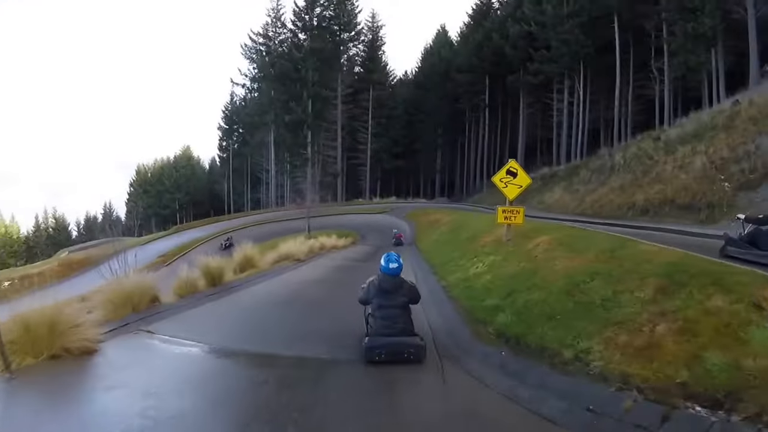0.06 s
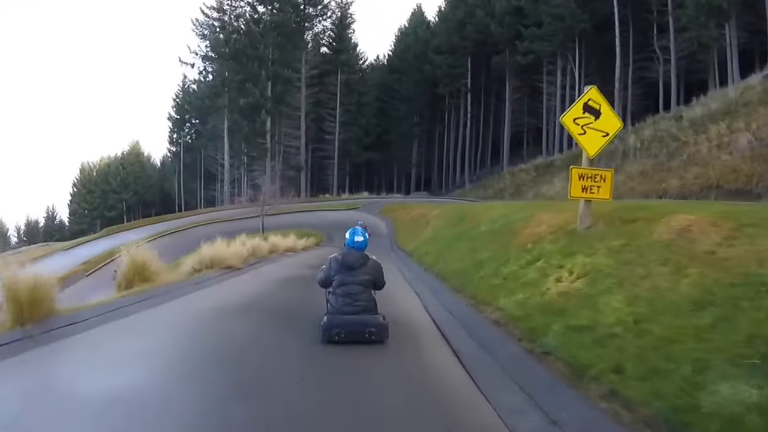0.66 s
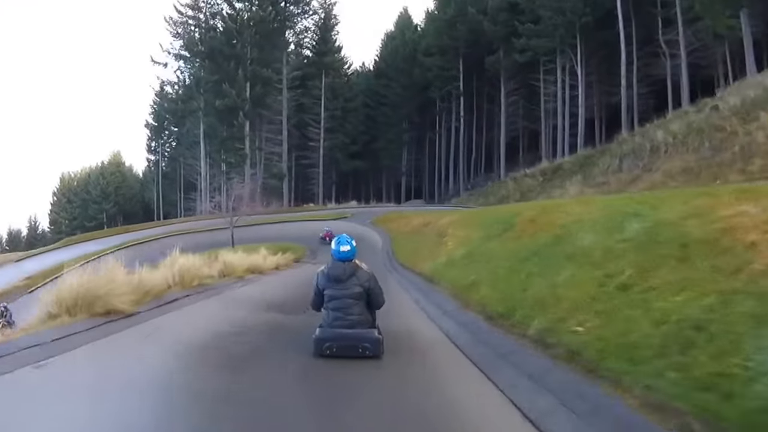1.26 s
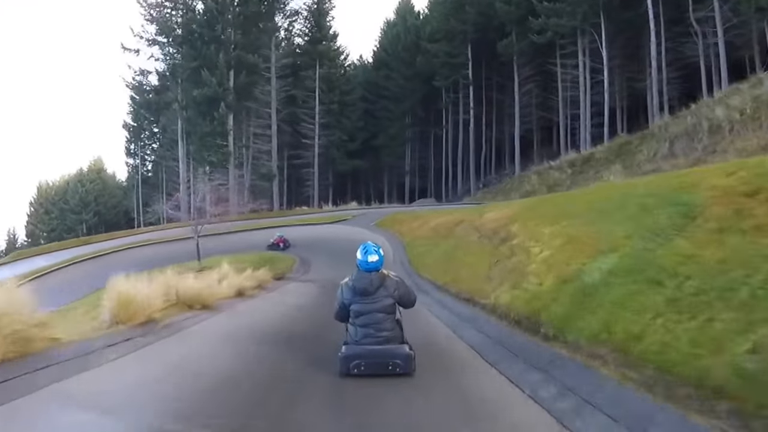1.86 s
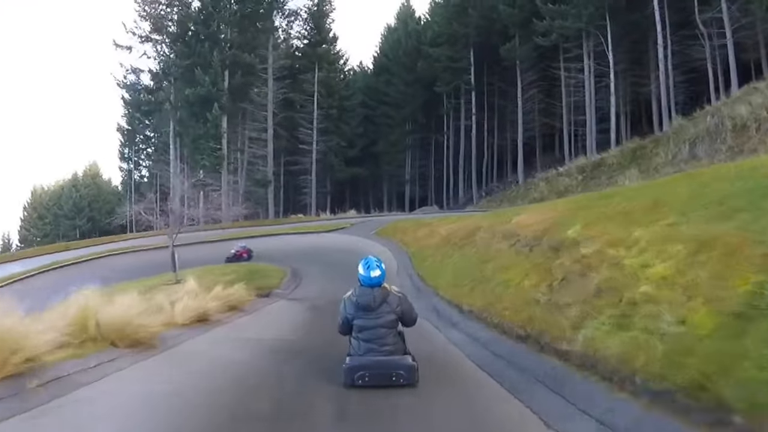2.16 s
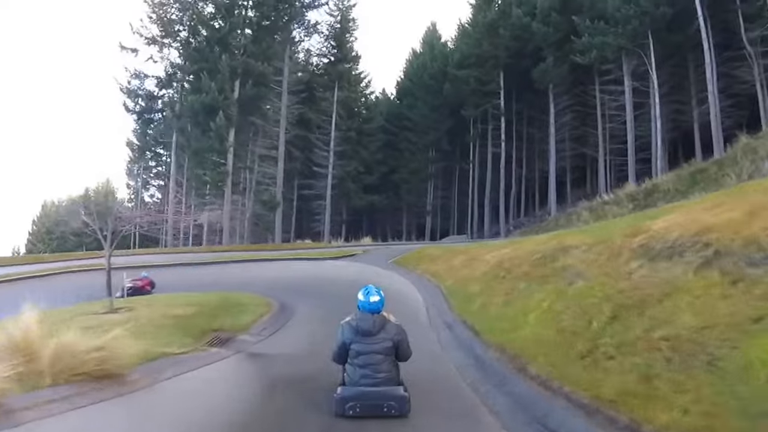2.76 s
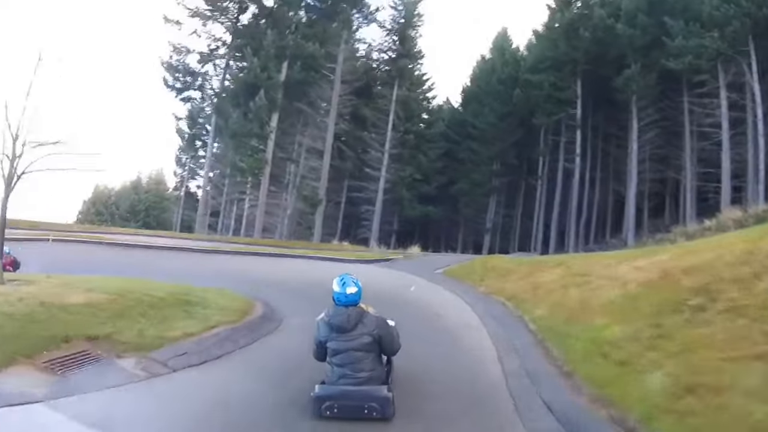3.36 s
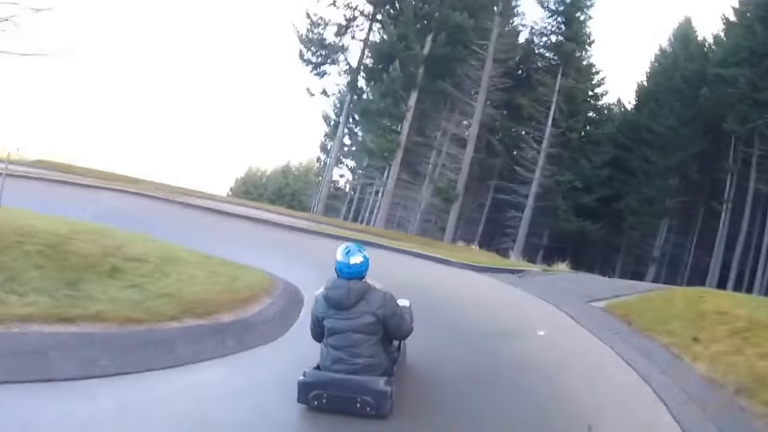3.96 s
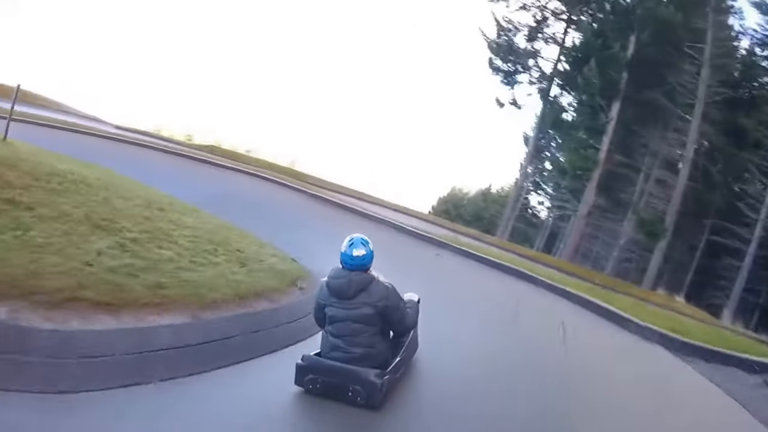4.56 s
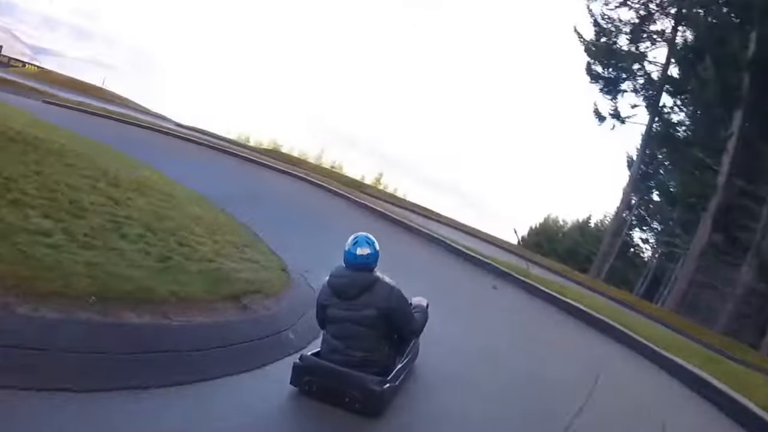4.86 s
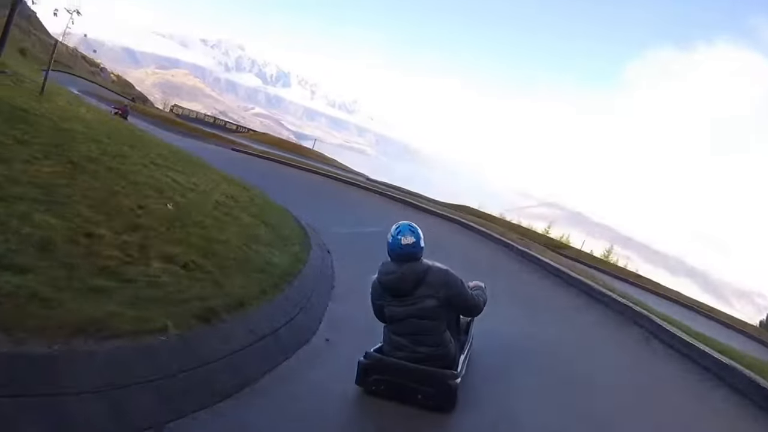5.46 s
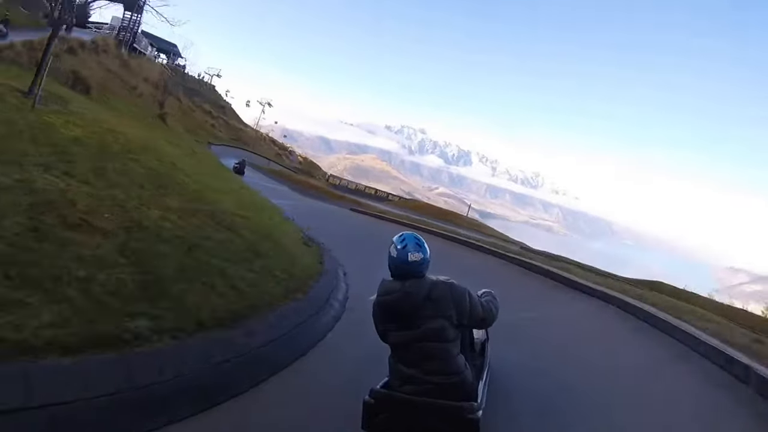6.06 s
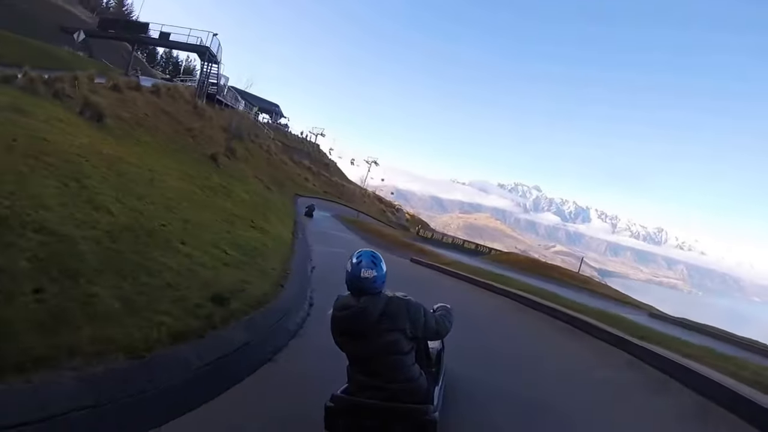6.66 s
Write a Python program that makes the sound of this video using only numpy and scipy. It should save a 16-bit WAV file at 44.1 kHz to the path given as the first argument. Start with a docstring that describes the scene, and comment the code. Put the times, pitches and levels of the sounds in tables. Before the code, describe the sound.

Small hard cart wheels rumble and hiss along damp concrete, with knocks from the track and wind buffeting the microphone.

```python
"""Luge cart on damp concrete, from the seat.

The microphone rides close above small hard wheels that drum the plastic shell, chatter once or twice
a turn and hiss on the wet track. Joints knock the chassis and its hollow tub, and grit ticks against it.
Gusts buffet the microphone, mostly on the straight; in a long bend the treads scrub and skip."""
import sys
import numpy as np
from scipy import signal
from scipy.fft import rfft, irfft, next_fast_len
from scipy.io import wavfile

SR = 44100
rng = np.random.default_rng(int(sys.argv[2]) if len(sys.argv) > 2 else 0)


def waveform_to_disk(signal):
    """Save audio, clipped to [-1, 1], as 16-bit WAV at the path in sys.argv[1]."""
    frames = np.transpose(np.atleast_2d(signal))
    scaled = np.clip(frames, -1, 1) * 32767
    samples = np.round(scaled).astype(np.int16)
    wavfile.write(sys.argv[1], SR, samples)


N = 295470
T = np.arange(N) / SR
BINS = np.fft.rfftfreq(8192, 1 / SR)

# Resonances of the cart around the microphone. Each row: frequency in Hz, width in Hz, relative dB.
SHELL_MODES = [(168.3, 30, 3.5), (230.3, 32, 4), (309.2, 64, -3.5), (385, 170, -12.5)]  # plastic shell with its rider
PAN_MODES = [(461, 38, -0.5), (527, 28, -4), (579, 28, -9), (665, 18, -14), (683, 50, -10), (765, 46, -14)]  # floor pan
CHASSIS_MODES = [(859, 106, 6.5), (995, 70, -7.5), (1082, 210, -0.5), (1244, 120, -2), (1485, 110, -7),
                 (1763, 220, -6.5)]  # axles and steering
TREAD_MODES = [(2190, 320, -7), (2610, 820, -14.5), (3200, 720, -14)]
CONTACT_MODES = [(5080, 330, -0.5), (5496, 350, 3)]  # bright rings where wheel meets track
RIM_MODES = [(6450, 210, 0), (6600, 280, -5)]
TUB_MODES = [(306, 21, 7), (403, 42, 1.5), (516, 57, -21), (610, 60, -2.5), (1200, 50, -27),
             (1290, 50, -19), (1430, 38, -27)]
SCRUB_MODES = [(974, 110, 7.5), (1040, 100, -1), (1300, 95, 9), (1470, 93, 0.5), (1770, 300, -5.5),
               (3270, 530, -23)]  # woken by wheels sliding sideways
# Spectra of spray on the cart and air on the microphone. Each row: frequency in Hz, relative dB.
SPRAY_SPECTRUM = [(2500, -12), (4200, -5.5), (6000, 1), (7500, -2), (8800, -3.5), (9900, -4),
                  (10450, -16.5), (11100, -20.5), (11600, -27.5), (13000, -27)]
AIR_SPECTRUM = [(5, -28.5), (18, -16), (32, 2.5), (50, 0), (80, -1), (125, -7.5), (200, -9), (400, -28),
                (900, -45.5), (3000, -77.5)]

# The cart's pace. Each row: time in seconds, wheel turns per second.
WHEEL_SPEED = [(0.0, 18.68), (0.42, 18.8), (0.84, 20.24), (1.26, 19.94), (1.68, 19.46), (2.09, 20.24),
               (2.51, 20.0), (2.93, 20.96), (3.35, 22.34), (3.77, 22.22), (4.19, 21.38), (4.61, 20.78),
               (5.03, 20.6), (5.44, 21.26), (5.86, 20.78), (6.28, 20.9), (6.7, 20.72)]
# Wheel chatter, deeper in the bend. Each row: time in seconds, depth from 0 to 1.
CHATTER_DEPTH = [(0, 0.1), (1.8, 0.29), (3.1, 0.18), (4.1, 0.4), (5.0, 0.35), (5.6, 0.41), (6.3, 0.25),
                 (6.7, 0.44)]
# The concrete below. Each row: time in seconds, then roughness, pan growl and chassis chatter in dB.
SURFACE = [(0, -2, -27.5, -37), (.3, -1, -26.5, -38.5), (.9, 0.5, -28, -39), (1.15, 1.5, -28, -39),
           (1.5, -2.5, -28.5, -40), (1.75, 3, -25.5, -39.5), (2.15, 1, -30.5, -41.5),
           (2.4, -0.5, -26.5, -40), (2.7, -1.5, -31, -41.5), (3.1, -0.5, -27, -37), (3.6, -1, -26.5, -38.5),
           (4.3, -0.5, -30, -42.5), (4.8, 0, -29.5, -39), (5.45, 1, -26.5, -36), (5.95, 0.5, -27.5, -40),
           (6.2, -0.5, -28, -38), (6.7, 2, -27, -37.5)]
# Smoother or drier patches. Each row: centre and length in seconds, drops of rolling and hiss in dB.
LULLS = [(0.075, 0.044, 4.5, 5.5), (0.702, 0.11, 3.5, 3), (0.845, 0.036, 4.5, -1), (1.135, 0.075, 5, -1),
         (1.767, 0.11, -1, 4.5), (2.093, 0.075, 3, 4), (2.91, 0.048, 3.5, -1.5), (3.68, 0.075, 6, 3),
         (4.287, 0.098, 2.5, 1.5)]
# Water on the track. Each row: time in seconds, wetness in dB.
WETNESS = [(0, 8), (.2, -2), (.42, -4.5), (.8, 3), (1.1, 0), (1.6, 3), (2.1, 1.5), (2.6, 2), (3.5, 3.5),
           (3.65, 0), (4.1, 0.5), (4.75, -4), (5.1, 3), (5.6, 2.5), (6.3, 0), (6.7, 3.5)]
# Steady airflow on the microphone. Each row: time in seconds, level in dB.
AIRFLOW = [(0, -18), (.45, -22), (1.1, -22), (1.5, -22.5), (1.85, -22), (2.5, -25.5), (3.1, -18.5),
           (3.5, -24.5), (4.0, -25), (4.85, -29), (5.25, -22.5), (6.1, -25.5), (6.7, -26)]
# Gusts on top of it. Each row: peak time in seconds, length in seconds, rise in dB.
GUSTS = [(.325, 0.12, 6), (.6, 0.06, 8), (.93, 0.046, 8), (1.01, 0.079, 8), (1.21, 0.042, 6.5),
         (1.33, .06, 9), (1.91, 0.056, 3), (2.06, 0.043, 4), (2.38, 0.18, 7), (2.66, 0.18, 2.5),
         (3.02, 0.1, 4), (3.16, 0.093, 3), (3.28, 0.046, 9), (3.61, 0.08, 8)]
# Single eddies of air. Each row: time in seconds, relative level in dB, pitch in Hz.
EDDIES = [(0.168, 3, 69.5), (0.306, -2, 95), (.328, 4.5, 115), (.518, -1, 55), (0.588, -1.5, 125),
          (0.924, 0, 92.5), (0.999, 5.5, 173), (1.062, -4, 120), (1.194, -5, 85), (1.321, -8, 55),
          (2.107, 5.5, 165), (2.315, 1, 45), (2.377, -5, 55), (2.437, -3, 50), (2.584, -1.5, 55),
          (2.648, -1.5, 50), (2.709, 4.5, 105), (2.836, 0, 48), (2.995, 6, 123), (3.036, 3, 62),
          (3.623, 1, 55)]
# Track joints. Each row: start in seconds, clack, thud and splash in relative dB, rattle decay in seconds.
JOINTS = [(.005, -21, -32, -38, 0.026), (0.031, -16, -19, -39, .008), (.098, -23.5, -4, -43, 0.013),
          (.138, -19.5, -6, -43, 0.0084), (0.262, -25.5, 2, -40, 0.02), (0.413, -26, 0.5, -45, 0.013),
          (0.614, -17, 6, -43, 0.0049), (0.634, -20.5, -3.5, -39.5, 0.012), (.742, -16.5, -1, -38, 0.0057),
          (0.758, -17.5, -12, -37, 0.0095), (.881, -25.5, -28, -42, 0.017), (0.914, -31, -3, -52, 0.014),
          (.982, -22, -12, -42, 0.012), (1.179, -29, 1.5, -46, 0.0098), (1.252, -27, -15, -54, .008),
          (1.387, -26, 3.5, -48, 0.0055), (1.643, -24, -11, -51, 0.016), (1.692, -20, -3, -39, 0.027),
          (1.745, -18.5, 3.5, -40, 0.0066), (1.892, -29, 4, -50, 0.005), (1.936, -24, -6, -44, 0.03),
          (1.987, -24, 0.5, -41, 0.011), (2.004, -23, -5, -45, 0.0091), (2.106, -42, 3.5, -50, 0.0074),
          (2.186, -27, 1, -42, .008), (2.379, -22, -2, -47, 0.0075), (2.426, -22, -6, -55, 0.012),
          (2.476, -27, -1, -52, 0.006), (2.714, -20, -6, -50, 0.0055), (2.829, -21, -14, -39, 0.0086),
          (2.846, -34, 0.5, -48, 0.0058), (2.967, -22.5, -15, -43, 0.013), (3.039, -26, -12, -42, 0.016),
          (3.144, -38, -4, -53, 0.012), (3.207, -30, -16, -54, 0.0082), (3.294, -28, 2, -40, 0.016),
          (3.367, -25, -12, -41, 0.022), (3.42, -36, -4.5, -50, 0.008), (3.545, -23.5, -9, -38.5, 0.023),
          (3.567, -24, -4.5, -41, 0.015), (3.699, -21, -1.5, -38, 0.022), (4.063, -24, -7.5, -41, 0.052),
          (4.487, -23, 0.5, -46, 0.0079), (5.022, -29, -8, -46, 0.0068), (5.373, -34, 0, -54, 0.0095),
          (5.975, -28, 2, -44, 0.01), (6.025, -40, 2.5, -58, 0.0074), (6.304, -34, -0.5, -50, 0.0058)]
# Loose steering parts clinking. Each row: start in seconds, pitch in Hz, level in dB.
CLINKS = [(.006, 2130, -29.5), (0.033, 1250, -34), (0.15, 1250, -35), (.613, 2220, -40), (0.745, 1270, -29),
          (2.987, 1050, -35), (3.049, 1000, -31), (3.147, 1050, -39)]
# Stones flung against the cart. Each row: start in seconds, relative level in dB.
STONES = [(.19, -31), (.245, -33), (1.483, -37), (1.697, -37), (2.205, -31), (3.364, -37), (3.56, -32),
          (4.067, -44), (4.101, -31), (4.203, -34), (4.348, -39), (4.366, -31.5), (4.382, -37), (4.44, -42),
          (4.575, -41), (4.595, -39), (5.199, -41), (5.311, -34), (5.744, -36), (5.881, -34), (6.075, -37),
          (6.467, -30), (6.487, -33), (6.535, -32)]
# The cart bottoming out. Each row: start in seconds, level in dB.
KNOCKS = [(0.257, -13), (0.741, -4), (.757, -9.5), (1.746, -18), (2.001, -7.5), (2.381, -11), (3.57, -8)]
# Water film on the straight. Each row: time in seconds, centre of the sizzle in Hz, level in dB.
WATER_FILM = [(0, 8500, -80), (.7, 8600, -62), (1.1, 8700, -54), (1.6, 8600, -63), (1.9, 7500, -58),
              (2.2, 7300, -72), (2.55, 7000, -45), (2.9, 7200, -58), (3.4, 7500, -54), (3.7, 7500, -60),
              (6.7, 7500, -83)]
# Treads slipping, hardest in the bend. Each row: start in seconds, level in dB.
SKIPS = [(1.078, -34), (1.152, -35), (1.327, -37), (1.353, -34), (1.825, -42), (3.883, -32), (3.975, -34),
         (4.251, -35), (4.344, -36), (4.581, -37), (4.633, -46), (4.922, -34), (4.971, -31.5), (5.067, -40),
         (5.165, -32.5), (5.212, -32), (5.397, -30.5), (5.449, -34), (5.472, -39), (5.496, -27),
         (5.545, -34), (5.588, -30), (5.639, -32), (5.685, -32), (5.732, -33), (5.926, -29.5), (5.972, -34),
         (6.241, -31), (6.468, -30), (6.545, -32)]
# Coarse concrete. Each row: centre and length in seconds, level of the pan's ring in dB, pitch in Hz.
COARSE_STRETCHES = [(1.757, 0.14, -32, 445), (2.479, 0.58, -36, 458), (3.053, 0.27, -24, 475.4),
                    (5.454, 0.11, -29, 454)]
# Side load on the wheels. Each row: time in seconds, level of the scrub in dB.
SIDE_LOAD = [(0, -55), (2.7, -62), (4.3, -42), (5.0, -48), (5.5, -42), (5.72, -39), (6.0, -39.5),
             (6.3, -44.5), (6.7, -38)]
# Drone of the loaded shell. Each row: time in seconds, pitch in Hz, level in dB.
SHELL_DRONE = [(0, 201, -31.5), (4.6, 214.3, -46.5), (5.5, 234, -35), (5.7, 204.9, -13.5),
               (5.8, 205.8, -23), (5.92, 210.1, -18.5), (6.03, 231, -19), (6.11, 237.8, -24),
               (6.3, 199.7, -18), (6.45, 198.7, -32), (6.68, 224.7, -25)]


def amp(db):
    """Decibels to gain."""
    return 10 ** (np.asarray(db) / 20)


def unit_rms(x):
    """Scales to rms 1."""
    return x / np.sqrt(np.mean(x ** 2) + 1e-20)


def curves(rows):
    """Each column after the time, interpolated to every sample."""
    s, *columns = np.transpose(rows)
    return [np.interp(T, s, c) for c in columns]


def swells(rows):
    """Sum of bell curves. Each row: centre in seconds, length in seconds, height."""
    out = np.zeros(N)
    for s, length, height in rows:
        near = slice(*np.searchsorted(T, [s - 2 * length, s + 2 * length]))
        out[near] += height * np.exp(-(2 * (T[near] - s) / length) ** 2)
    return out


def add(mix, s, sound):
    """Mixes a sound in at s seconds."""
    part = mix[max(0, round(s * SR)):][:len(sound)]
    part += sound[:len(part)]


def wander(hz):
    """Smooth random drift of rms 1, rolling off above hz."""
    size = next_fast_len(N, real=True)
    spectrum = rfft(rng.standard_normal(size)) / (1 + (np.fft.rfftfreq(size, 1 / SR) / hz) ** 4)
    return unit_rms(irfft(spectrum, size)[:N])


def band(hz, half_width_hz, skirt_hz, skirt):
    """A resonance shaken by noise, its centre following the curve hz; rms 1."""
    phase = 2 * np.pi * np.cumsum(hz) / SR
    a, b = (wander(half_width_hz) + skirt * wander(skirt_hz) for _ in range(2))
    return unit_rms(a * np.cos(phase) + b * np.sin(phase))


def shape(spectrum):
    """Gain per bin from a spectrum table."""
    hz, db = np.transpose(spectrum)
    return amp(np.interp(np.log(BINS + 1), np.log(hz), db))


def body(modes, low_hz, high_hz):
    """Gain per bin of resonances that radiate between two edges."""
    power = sum(amp(db) ** 2 / (1 + (2 * (BINS - hz) / width) ** 2) for hz, width, db in modes)
    return np.sqrt(power / (1 + (low_hz / (BINS + 1)) ** 12) / (1 + (BINS / high_hz) ** 12))


def ring(force, gain):
    """Passes a force through the minimum-phase response of this gain; white noise keeps its level."""
    log_gain = np.log(np.maximum(gain / gain.max(), 1e-5))
    mirrored = np.concatenate([log_gain, log_gain[-2:0:-1]])
    response = np.fft.ifft(np.exp(np.conj(signal.hilbert(mirrored)))).real[:len(BINS)]
    return signal.oaconvolve(force, response / np.linalg.norm(response))[:len(force)]


def texture(pressure, gain, per_s, spread_db, smooth):
    """Tiny uneven impacts over smooth noise, scaled by wheel pressure, ring a part of the cart; rms 1."""
    sizes = amp(spread_db * np.minimum(rng.exponential(1, N), 4)) * rng.choice([-1, 1], N)
    impacts = unit_rms(sizes * (rng.random(N) < per_s / SR))
    force = impacts + smooth * rng.standard_normal(N)
    return unit_rms(ring(force * pressure, gain))


def blow(decay_s, snap):
    """A first contact, then a dying scatter of rebounds; about rms 1 over its decay time."""
    t = T[:SR // 8]
    force = rng.standard_normal(len(t)) * np.exp(-t / decay_s)
    force[0] += snap * np.sqrt(decay_s * SR)
    return force * np.sqrt(decay_s * SR) / np.linalg.norm(force)


def wheel_load(sharpness=1.8, weaker_press=0.36, skew=0.18, flutter_db=2):
    """Out-of-round wheels press twice a turn, once harder; each press bites fast and lets go slowly."""
    turns_per_s, = curves(WHEEL_SPEED)
    depth, = curves(CHATTER_DEPTH)
    angle = 2 * np.pi * np.cumsum(turns_per_s) / SR
    presses = np.exp(sharpness * (np.cos(2 * angle + skew * np.cos(2 * angle)) - 1))
    presses *= np.where(np.cos(angle) > 0, 1, weaker_press)
    return unit_rms(1 - depth + depth * unit_rms(presses)) * amp(flutter_db * wander(hz=30))


def patches(uneven_db=1.24):
    """Gain of the rolling as rough and smooth patches pass under the seat."""
    lull_db = swells([(s, length, db) for s, length, db, _ in LULLS])
    return amp(uneven_db * wander(hz=23) - lull_db)


def rolling(load, drum_db=-19, rasp_db=-50):
    """Rough concrete shakes the shell, floor pan, chassis and treads, right under the microphone."""
    rough_db, growl_db, chatter_db = curves(SURFACE)
    skid_db = swells([(5.5, 0.32, 5.5)])  # harder rasp at the tightest point of the bend
    drum = texture(load ** 0.19, body(SHELL_MODES, 144.8, 465), per_s=900, spread_db=0, smooth=1.36)
    growl = texture(load ** 0.5, body(PAN_MODES, 398, 864), per_s=1200, spread_db=1, smooth=0.83)
    chatter = texture(load ** 0.64, body(CHASSIS_MODES, 830, 2060),
                      per_s=1000, spread_db=1.5, smooth=0.96)
    rasp = texture(load ** 0.56, body(TREAD_MODES, 1800, 3960), per_s=2200, spread_db=2.5, smooth=0.84)
    rumble = amp(drum_db + rough_db) * drum + amp(growl_db) * growl
    rattle = amp(chatter_db) * chatter + amp(rasp_db + 0.4 * rough_db + skid_db) * rasp
    return rumble + rattle


def wet_hiss(load, lag_s=0.0071, hiss_db=-51, rim_db=-49.5, spray_db=-51.5):
    """Droplets squeezed from under the wheels hiss, set the rims singing and fly off as spray."""
    pole = np.exp(-1 / (lag_s * SR))
    squeeze = signal.lfilter([1 - pole], [1, -pole], load)  # trails the load, its peaks rounded
    wet_db = curves(WETNESS)[0] - swells([(s, length, db) for s, length, _, db in LULLS])
    damping_db = np.interp(T, [1.9, 5.1], [0, 4.5])  # side load in the bend damps the rims
    hiss = texture(squeeze ** 0.5, body(CONTACT_MODES, 4720, 5800), per_s=2500, spread_db=5, smooth=0.71)
    rim = texture(squeeze ** 0.62, body(RIM_MODES, 6640, 7500), per_s=2300, spread_db=7, smooth=0.83)
    spray = texture(squeeze ** 0.73, shape(SPRAY_SPECTRUM), per_s=2400, spread_db=1.5, smooth=0.36)
    return amp(wet_db) * (amp(hiss_db) * hiss + amp(rim_db - damping_db) * rim + amp(spray_db) * spray)


def wind(lumps_db=2, eddy_cycles=0.66):
    """Lumpy turbulence swells in gusts; single eddies give short, low puffs on the microphone."""
    air_db, = curves(AIRFLOW)
    turbulence = rng.standard_normal(N) * amp(lumps_db * wander(hz=27))
    air = amp(air_db + swells(GUSTS)) * unit_rms(ring(turbulence, shape(AIR_SPECTRUM)))
    for s, db, hz in EDDIES:
        cycles = T[:SR // 8] * hz
        age = 2 * cycles / eddy_cycles
        eddy = age * np.exp(-age) * np.sin(2 * np.pi * (cycles + rng.random()))
        add(air, s - 0.004, amp(db) * eddy)
    return air


def wheel_contact(lead_s=0.01, length_s=0.01, dip_db=1.5):
    """Gain that dips as the wheels unload just before each joint."""
    return amp(-swells([(s - lead_s, length_s, dip_db) for s, *_ in JOINTS]))


def cracks(per_s=4, spread_db=2, decay_s=0.0096):
    """Small cracks met at random, as rows like those of JOINTS."""
    gaps, sizes = rng.random((100, 2)).T
    times = np.cumsum(2 * gaps) / per_s
    sizes_db = spread_db * (2 * sizes - 1)
    return [(s, db - 28.5, db - 18, db - 46, decay_s) for s, db in zip(times, sizes_db)]


def bumps():
    """Each joint or crack clacks the axles, thuds the shell and splashes the wheels."""
    clacks, thuds, splashes = np.zeros((3, N))
    for s, clack_db, thud_db, splash_db, decay_s in list(JOINTS) + cracks():
        add(clacks, s, amp(clack_db - 11) * blow(decay_s, snap=0.38))
        add(thuds, s, amp(thud_db - 11) * blow(0.89 * decay_s, snap=0.45))
        add(splashes, s, amp(splash_db - 1) * blow(decay_s=0.018, snap=0.06))
    return (ring(clacks, body(PAN_MODES + CHASSIS_MODES + TREAD_MODES, 490, 4560))
            + ring(thuds, body(SHELL_MODES + PAN_MODES, 133, 396))
            + ring(splashes, body(CONTACT_MODES + RIM_MODES, 2980, 9700)))


def clinks(width_hz=340):
    """Loose steering parts, within arm's reach, rattle briefly when jolted."""
    out = np.zeros(N)
    for s, hz, db in CLINKS:
        mode = body([(hz, width_hz, 0)], 0.5 * hz, 2 * hz)
        add(out, s, amp(db) * ring(blow(decay_s=0.016, snap=0.71), mode))
    return out


def grit(tread_db=-9, top_hz=10600):
    """Small stones tick against the cart and, more faintly, ring the treads."""
    force = np.zeros(N)
    for s, db in STONES:
        add(force, s, amp(db - 6) * blow(decay_s=0.0034, snap=0.3))
    ticks = ring(force, shape(SPRAY_SPECTRUM) / (1 + (BINS / top_hz) ** 40))
    return ticks + amp(tread_db) * ring(force, body(TREAD_MODES, 1400, 4200))


def knocks():
    """At the deepest joints the cart bottoms out with one knock of its hollow tub."""
    force = np.zeros(N)
    for s, db in KNOCKS:
        add(force, s, amp(db) * blow(decay_s=0.0014, snap=6.8))
    return ring(force, body(TUB_MODES, 248, 1640))


def sizzle():
    """The water film tears off the wheels in a broad band of hiss that shifts with its depth."""
    hz, db = curves(WATER_FILM)
    return amp(db) * band(hz, half_width_hz=500, skirt_hz=1200, skirt=0.31)


def skips(rise_s=0.0028):
    """Each sideways slip of a tread is one short gritty scrape with a spit of water."""
    age = T[:SR // 25] / rise_s
    envelope = age * np.exp(1 - age)
    force = np.zeros(N)
    for s, db in SKIPS:
        add(force, s, amp(db) * envelope * rng.laplace(size=len(age)) / np.sqrt(2))
    scrape = amp(-0.5) * ring(force, body(SCRUB_MODES, 895, 3830))
    rasp = amp(-8) * ring(force, body(TREAD_MODES, 1500, 3850))
    spit = amp(-10) * ring(force, body(CONTACT_MODES + RIM_MODES, 4600, 9500))
    return scrape + rasp + spit


def pan_ring():
    """Coarse stretches of concrete keep the floor pan ringing on its lowest mode."""
    times, _, _, hz = np.transpose(COARSE_STRETCHES)
    gain = swells([(s, length, amp(db)) for s, length, db, _ in COARSE_STRETCHES])
    return gain * band(np.interp(T, times, hz), half_width_hz=5.2, skirt_hz=40, skirt=0.15)


def cornering(load, upper_ratio=1.7, upper_db=-10.5):
    """In the bend the wheels scrub sideways and the loaded shell drones, its pitch shifting with the lean."""
    scrub_db, = curves(SIDE_LOAD)
    drone_hz, drone_db = curves(SHELL_DRONE)
    scrub = texture(load ** 0.58, body(SCRUB_MODES, 875, 3800), per_s=3300, spread_db=3, smooth=0.58)
    lower_mode = band(drone_hz, half_width_hz=45, skirt_hz=55, skirt=0.14)
    upper_mode = band(upper_ratio * drone_hz, half_width_hz=23, skirt_hz=90, skirt=0.54)
    return amp(scrub_db) * scrub + amp(drone_db) * (lower_mode + amp(upper_db) * upper_mode)


def scene():
    """The ride in mono, from one microphone at the seat."""
    patch_gain = patches()
    load = wheel_load()
    wheels = patch_gain * rolling(load) + wet_hiss(load) + cornering(load) + pan_ring()
    cart = wheels * wheel_contact() + sizzle() + bumps() + skips() + knocks() + clinks() + grit()
    return (cart + wind())[None]


def record(dry, ceiling=0.85, cutoff_hz=12800):
    """The highest peaks are rounded off softly, then the top of the treble is cut."""
    rounded = dry / (1 + (dry / ceiling) ** 6) ** (1 / 6)
    lowpass = signal.firwin(511, cutoff_hz, window=("kaiser", 9), fs=SR)
    return signal.oaconvolve(rounded, lowpass[None], "same")


dry = scene()
out = record(dry)
waveform_to_disk(out)
```